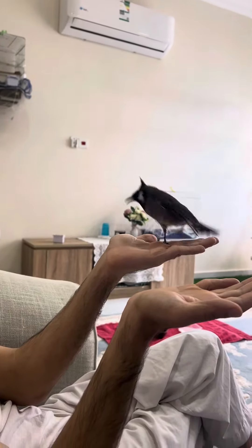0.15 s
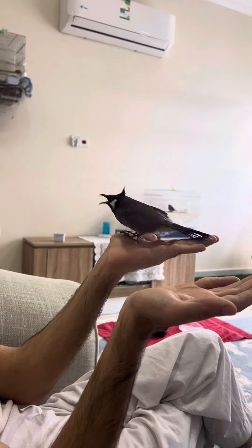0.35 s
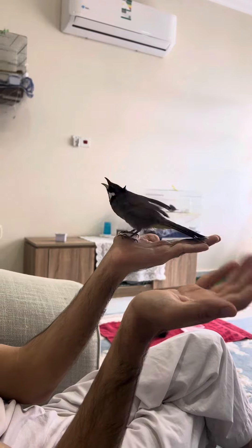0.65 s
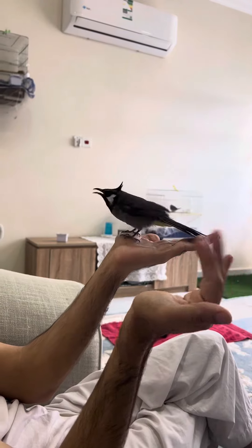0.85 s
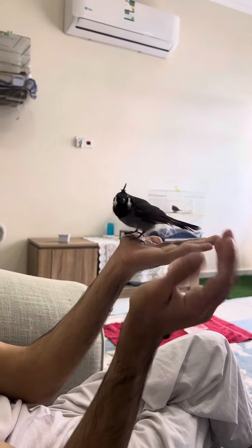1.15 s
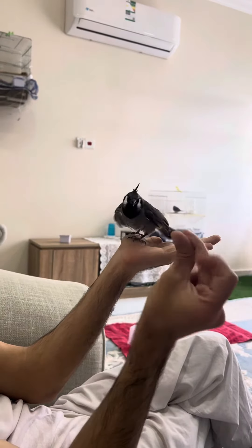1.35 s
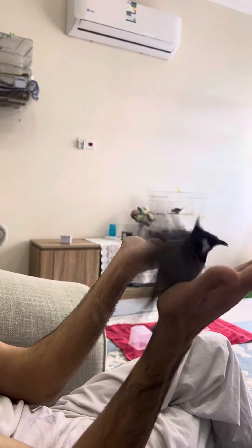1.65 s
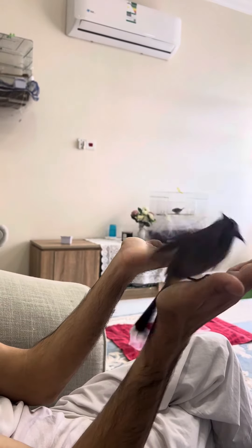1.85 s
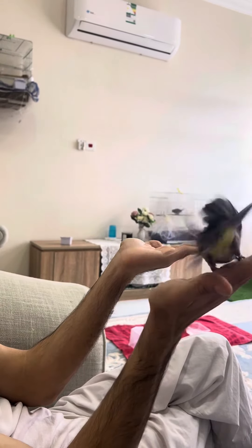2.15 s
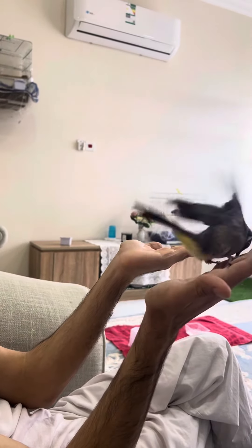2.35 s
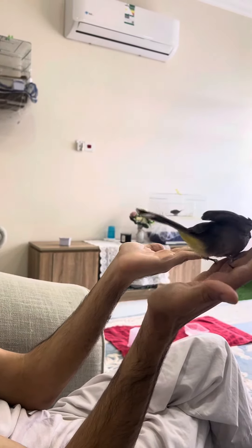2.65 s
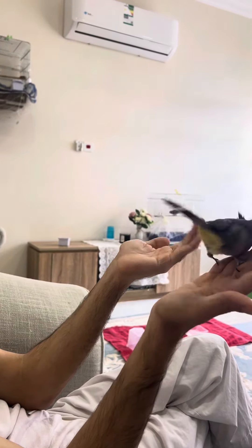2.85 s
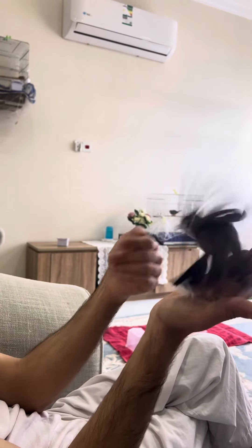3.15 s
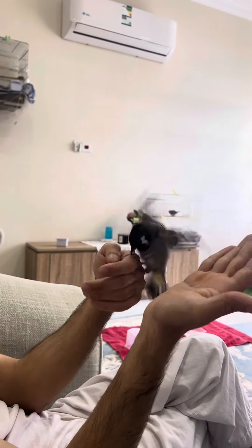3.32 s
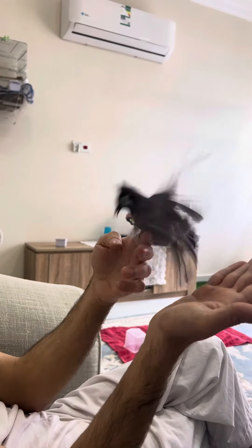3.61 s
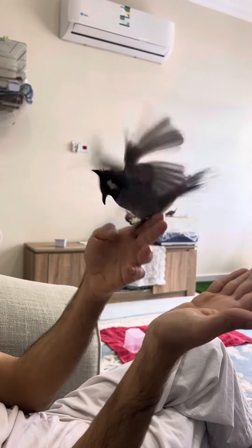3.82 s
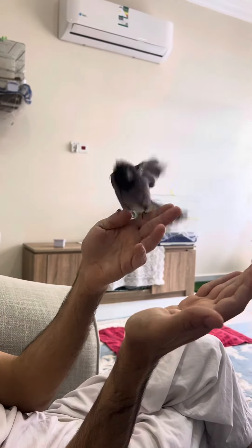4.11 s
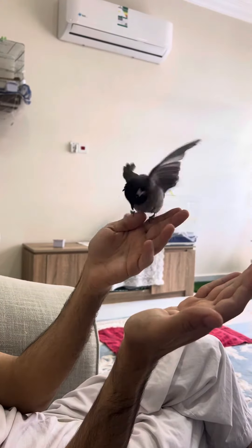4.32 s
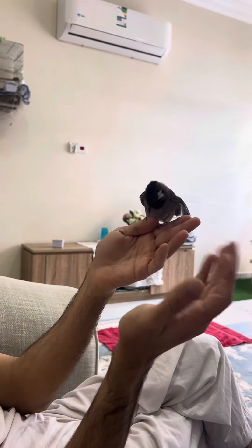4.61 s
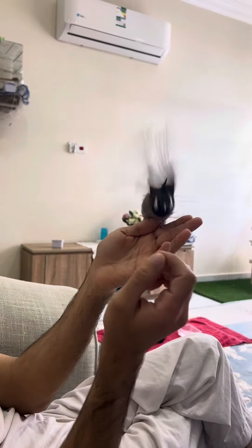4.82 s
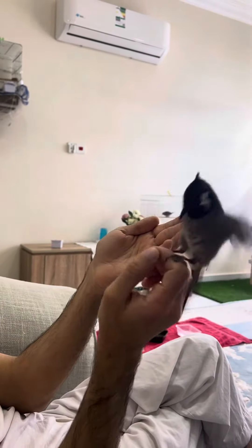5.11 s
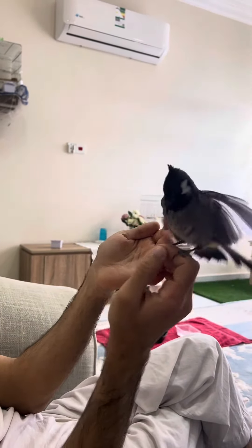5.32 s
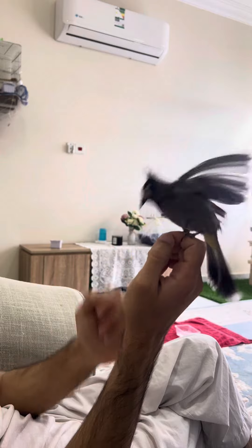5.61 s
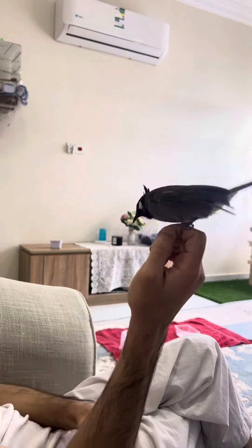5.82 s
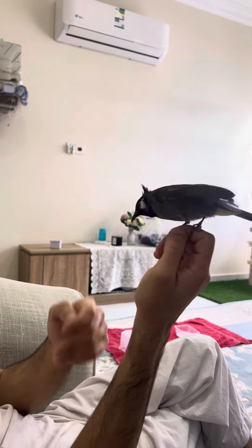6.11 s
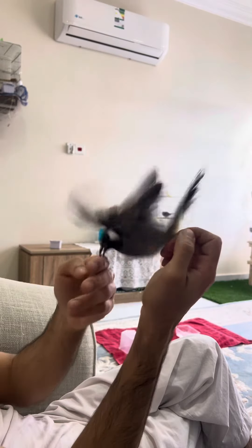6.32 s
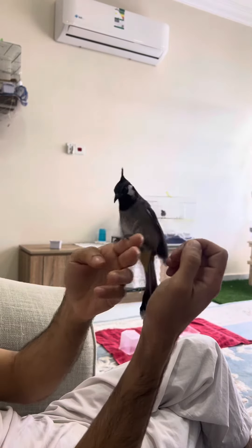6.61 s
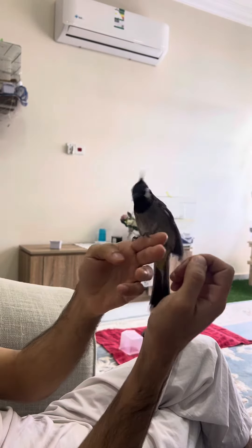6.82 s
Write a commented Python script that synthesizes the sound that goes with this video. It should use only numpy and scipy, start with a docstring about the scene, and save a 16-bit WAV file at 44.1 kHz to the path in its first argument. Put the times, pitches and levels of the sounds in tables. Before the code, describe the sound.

A small, hard-walled living room with faint steady hush. At the start a far bird's whistle glides upward through the room echo over low rumble and rustle from a nearby bird's wings. Bubbly far whistles rise and fall until about 0.85 s, with mellow near chirps around 0.5 and 1.15-1.4, and thin high peeps at 0.2 and 0.9. A crisp finger snap cracks at 1.37. From 1.5 to 1.9 wings flutter in fast soft puffs and thumps; short far chirrups follow until 2.6, then a quiet near chirp at 2.7. Far warbling returns from 3.0 to 4.0, with wing beats and dry claw ticks. It calms; low coos at 4.6-4.85 meet two firm flaps at 4.8-4.9 and another at 5.07. A short far warble comes at 5.45-5.65, a hoarse near chirp at 6.1, ticks and a light flap around 6.3, and a soft coo at 6.87.

```python
"""A whistle glides upward over low rumble and rustle: a far bird, smeared by the walls of a bare living room.
Close by, a small bird chirps and coos softly as bent notes of a few partials; its wing beats puff and thump as
shaped noise, claws and quills tick as filtered bursts, and one finger snap rings a bank of resonances. Decaying
noise serves as the room's echo, a steady hush lies beneath, and a noise suppressor, two ports that disagree in
phase and a steep low-pass shape the whole."""
import sys
import numpy as np
from scipy import signal
from scipy.fft import rfft, irfft
from scipy.io import wavfile
from scipy.ndimage import uniform_filter1d

SR = 44100
rng = np.random.default_rng(int(sys.argv[2]) if len(sys.argv) > 2 else 0)


def generate_wav(signal):
    """Clip the signal to [-1, 1] and save it as 16-bit WAV at the path in sys.argv[1]."""
    frames = np.transpose(np.atleast_2d(signal))
    scaled = np.clip(frames, -1, 1) * 32767
    pcm = np.round(scaled).astype(np.int16)
    wavfile.write(sys.argv[1], SR, pcm)


N = 306936
T = np.arange(N) / SR

# Wing beats. Each row: start in seconds, strength in dB before the offset of each sound it makes.
WING_BEATS = [(0.05, -47), (1.496, -43.5), (1.591, -47), (1.612, -49), (1.671, -51), (1.726, -53.5),
              (1.785, -50), (1.84, -55), (3.11, -48.5), (3.374, -56.5), (3.435, -49), (3.573, -51),
              (4.825, -44.5), (4.904, -44.5), (5.065, -48), (6.377, -51.5)]


def from_db(db):
    """Amplitude ratio: 20 decibels are a factor of ten."""
    return 10 ** (np.asarray(db) / 20)


def rms_one(x):
    """Normalisation to unit mean power."""
    return x / np.sqrt(np.mean(x ** 2) + 1e-20)


def at_hz(points, hz):
    """Linear interpolation on a logarithmic frequency axis."""
    p = np.array(points)
    return np.interp(np.log(np.maximum(hz, 1)), np.log(p[:, 0]), p[:, 1])


def drift(rate_hz):
    """Low-passed noise as a random fluctuation of unit rms, up to about the given rate."""
    lowpass = signal.butter(2, rate_hz, fs=SR, output="sos")
    white = rng.standard_normal(N + SR)
    return rms_one(signal.sosfilt(lowpass, white)[SR:])   # the filter settles in the first second


def pair(x):
    """Partial coherence: a shared and an opposed signal set how alike left and right are at each frequency."""
    # Each row: frequency in Hz, left-right likeness (1 = identical).
    likeness = [(105, 1), (300, .75), (1000, .97), (2300, .55), (8000, .93), (12000, .98)]
    shared, opposed = rfft(x)
    hz = np.arange(len(shared)) * SR / x.shape[1]
    alike = np.clip(at_hz(likeness, hz), 0, 1)
    mid = np.sqrt((1 + alike) / 2) * shared
    side = np.sqrt((1 - alike) / 2) * opposed
    return irfft([mid + side, mid - side], x.shape[1])


def coloured(spectrum):
    """Spectral shaping: white noise weighted at each frequency, in stereo, rms 1."""
    white = rfft(rng.standard_normal((2, N)))
    hz = np.arange(white.shape[1]) * SR / N
    return rms_one(pair(irfft(white * from_db(at_hz(spectrum, hz)), N)))


def near_bird():
    """A syrinx excites harmonic partials whose balance gives each kind of call its timbre."""
    # Notes. Each row: start in seconds, length in seconds, first, turning and last pitch in Hz,
    # turn as a share of the length, top level in dB before the levels of the partials.
    chirp_notes = [(.475, 0.073, 1640, 1617, 1620, 0.15, -36), (.53, 0.13, 1623, 1642, 1556, 0.41, -35.5),
                   (1.142, 0.094, 1463, 1590, 1572, 0.28, -31),
                   (1.222, 0.18, 1590, 1538, 1242, 0.22, -33.5),
                   (2.698, 0.041, 1290, 1342, 1453, 0.38, -37.5),
                   (2.745, 0.16, 1443, 1442, 1400, 0.75, -40)]
    hoarse_notes = [(6.056, 0.06, 1378, 1277, 1470, 0.63, -48.5),
                    (6.11, 0.092, 1368, 1347, 1277, 0.2, -39.5),
                    (6.188, 0.12, 1310, 1228, 1235, 0.34, -47.5)]
    low_coo_notes = [(4.606, 0.15, 777, 843.6, 848, 0.61, -50), (4.775, 0.03, 957, 891, 760, 0.31, -46),
                     (4.822, 0.0321, 868, 948, 740, 0.5, -46)]
    high_coo_notes = [(6.778, 0.045, 1100, 1047, 993, .3, -61.5), (6.78, 0.029, 890, 800, 770, .7, -58),
                      (6.815, 0.045, 1010, 1005, 990, 0.65, -47),
                      (6.866, 0.048, 922, 956, 919, 0.39, -36.5), (6.918, 0.03, 965, 960, 940, 0.32, -58)]
    peep_notes = [(.21, .11, 5120, 5020, 4530, .7, -59.5), (.93, 0.085, 4930, 4580, 4135, .65, -55.5)]
    # Levels of partials 1, 2, 3 .. in dB against the level of the note.
    chirp_db = [-28.5, -4.5, -28.5, -24.5, -35.5, -27, -32.5, -33]
    hoarse_db = [-20.5, -2.5, -22.5, -37, -31, -28]
    low_coo_db = [6, 2.5, -0.5, -12, -21]
    high_coo_db = [-30.5, -0.5, -31, -22.5]
    peep_db = [5, 0]

    clear = voice(arcs(chirp_notes, swell_db=12.0, fade_db=7.9), stack(chirp_db),
                  edge_s=0.0053, waver=0.0079, shimmer_db=1.0)
    peeps = voice(arcs(peep_notes, swell_db=8.6, fade_db=1.59), stack(peep_db),
                  edge_s=0.0084, waver=0.0017, shimmer_db=1.5)
    hoarse = voice(arcs(hoarse_notes, swell_db=8.0, fade_db=18.4), stack(hoarse_db),
                   edge_s=0.0023, waver=0.007, shimmer_db=2.5)
    low_coos = voice(arcs(low_coo_notes, swell_db=9.7, fade_db=7.23), stack(low_coo_db) + halves(-12.5),
                     edge_s=0.0019, waver=0.013, shimmer_db=1.0)
    high_coos = voice(arcs(high_coo_notes, swell_db=10.0, fade_db=7.2), stack(high_coo_db),
                      edge_s=0.007, waver=0.0093, shimmer_db=2.1)
    return clear + peeps + hoarse + low_coos + high_coos


def arcs(rows, swell_db, fade_db):
    """Pitch and level share one effort: pitch bends where the level tops out."""
    pitch_roundness, level_roundness = 1.3, 1.43   # exponents of the curves about the turn
    notes, away = [], np.linspace(-1, 1, num=11)   # -1 start, 0 turn, 1 end
    before = away < 0
    for start, length, first, turning, last, turn, db in rows:
        turn = np.clip(turn, .05, .95)
        s = start + length * (turn + away * np.where(before, turn, 1 - turn))
        hz = turning + np.abs(away) ** pitch_roundness * (np.where(before, first, last) - turning)
        under_top_db = np.abs(away) ** level_roundness * np.where(before, swell_db, fade_db)
        notes.append(np.transpose([s, hz, db - under_top_db]))
    return notes


def stack(levels_db):
    """Harmonic series: partials numbered from one."""
    return list(enumerate(levels_db, 1))


def halves(db):
    """Period doubling: alternately strong and weak closings add lines between the partials."""
    return [(k + .5, db) for k in range(1, 4)]


def voice(notes, partials, edge_s, waver, shimmer_db):
    """Additive synthesis: partials follow one slightly unsteady pitch, each flickering on its own."""
    dulling_db = 0.8   # extra loss per partial above the second for one dB under the note's top level
    out = np.zeros(N)
    unsteady = 1 + waver * drift(320.0)
    shimmer = shimmer_db * drift(100.0)
    for note in notes:
        s, hz, db = np.transpose(note)
        span = slice(max(int(s[0] * SR), 0), int(s[-1] * SR))
        t = T[span]
        pitch = uniform_filter1d(np.interp(t, s, hz), size=140) * unsteady[span]
        phase = 2 * np.pi * np.cumsum(pitch) / SR
        since_start = t - s[0] + (s[0] <= 0)   # a note already sounding at time 0 has no fade-in
        fade = np.clip(np.minimum(since_start, s[-1] - t) / edge_s, 0, 1)
        level_db = np.interp(t, s, db)
        under_db = level_db - db.max()
        tone = 0
        for k, partial_db in partials:
            flicker_db = np.roll(shimmer, int(k * SR / 10))[span]   # its own stretch of the drift
            dulled_db = dulling_db * max(k - 2, 0) * under_db
            audible = k * pitch < SR / 2
            tone = tone + from_db(partial_db + dulled_db + flicker_db) * np.sin(k * phase) * audible
        out[span] += np.sqrt(2) * from_db(level_db) * fade * tone
    return out


def far_bird():
    """Near-sinusoidal whistles, their octave where the beak favours it, and breath turbulence that follows them."""
    octave_db, breath_db = -23.5, -26.5   # gains ahead of the mix
    tone = voice(whistles(), stack([0]), edge_s=.006, waver=.002, shimmer_db=1.5)
    loud = uniform_filter1d(np.abs(tone), size=200)
    beak = signal.butter(2, [4600, 9800], "band", fs=SR, output="sos")
    octave = signal.sosfilt(beak, tone ** 2 / (loud + 1e-9))   # squaring a sine doubles its frequency
    breath_band = signal.butter(4, [7800, 12500], "band", fs=SR, output="sos")
    hiss = signal.sosfilt(breath_band, rng.standard_normal(N))
    return tone + from_db(octave_db) * octave + from_db(breath_db) * loud * hiss


def whistles():
    """Frequency modulation: every far note is a line of (seconds, Hz, dB) points."""
    # Each row: start in seconds, length in seconds, first pitch in Hz, goal pitch in Hz,
    # easing time in seconds, top level in dB within the far bird's song.
    slide_rows = [(-.05, 0.26, 2217, 3361, 0.037, -35), (0.393, 0.048, 3660, 4350, 0.0066, -42.5),
                  (1.723, 0.016, 2300, 2850, 0.0067, -37.5), (1.884, .022, 4910, 3180, .0045, -40.5),
                  (2.192, 0.1, 2910, 4469, .0068, -34.5), (2.259, 0.021, 2190, 2864, 0.0066, -40.5),
                  (2.958, 0.031, 2110, 2710, 0.0064, -44.5), (2.977, 0.021, 1580, 2010, 0.0055, -52),
                  (2.986, 0.016, 11700, 8580, 0.0015, -36.5), (3.048, 0.27, 2158, 3345, .038, -36.5),
                  (5.443, 0.022, 2140, 2827, 0.0066, -41), (5.472, 0.018, 12300, 8500, 0.0032, -37.5)]
    # Each row: start in seconds, first, top and last pitch in Hz, level at the low point in dB within the song.
    dip_rows = [(1.845, 3710, 4850, 4910, -39), (2.398, 3400, 4400, 5100, -41.5),
                (2.542, 3147, 3900, 4265, -36), (5.558, 3965, 3680, 3980, -48)]
    # Figures by name. Each row: seconds after the start at pace 1, pitch in Hz at pitch 1,
    # level in dB against the figure's level.
    figure_shapes = { "hook": [(0, 3550, -13), (.017, 3700, -10), (.024, 5260, -18.5), (.038, 5300, -8),
                     (.052, 3700, -3), (.067, 2950, -4.5)], "rise": [(0, 3127, -14), (.06, 4127, -6.5),
                     (.115, 4680, 2.5), (.165, 4930, 2), (.21, 4915, -10)], "high fall": [(0, 8130, -4),
                     (.02, 7860, -2.5), (.044, 6300, -9.5)], "closing fall": [(0, 5520, -2.5),
                     (.017, 8244, -14.5), (.05, 6855, -12), (.104, 6990, -5), (.118, 7030, 1),
                     (.159, 4750, 0.9), (.185, 3534, -7.5), (.212, 2836, -16)], "warble": [(0, 7150, -27.5),
                     (.013, 4236, -14), (.025, 6200, -9.5), (.033, 6787, -6.5), (.05, 5440, -3.5),
                     (.056, 6580, -7), (.074, 5150, 0.5), (.09, 5730, -6), (.123, 5870, -1.5),
                     (.136, 5100, -1), (.148, 4190, -1.5), (.164, 3464, -21)], }
    # Each row: figure name, start in seconds, time stretch (1 = as written), pitch factor (1 = as written),
    # level in dB within the song.
    figures_sung = [("hook", .278, .76, 0.97, -24), ("rise", .43, 1.01, 1.003, -29),
                    ("closing fall", 0.619, 0.98, 0.98, -30), ("warble", 2.982, 0.98, 1.008, -24),
                    ("hook", 3.405, 1.06, 1.005, -27), ("high fall", 3.438, 0.97, 0.96, -38),
                    ("rise", 3.535, 1.01, 1.003, -28.5), ("closing fall", 3.748, 1.005, 1.005, -32),
                    ("warble", 5.472, 1.005, 0.98, -26.5)]
    figures = []
    for name, start, pace, pitch, db in figures_sung:
        figures.append(np.array(figure_shapes[name]) * [pace, pitch, 1] + [start, 0, db])
    return [slide(*row) for row in slide_rows] + [dip(*row) for row in dip_rows] + figures


def slide(start, length, first, goal, ease_s, db):
    """Critically damped glide: pitch leaves gently and closes in on its goal; the level swells, then sags."""
    swell_db, sag_db_per_s = 17.5, 25
    age = length * np.linspace(0, 1, num=16) ** 1.5
    top_s = 1.3 * ease_s + 0.28 * length   # when the swell tops out
    swell = -swell_db * np.clip(1 - age / top_s, 0, 1)
    sag = -sag_db_per_s * np.clip(age - top_s, 0, None)
    hz = goal + (first - goal) * (1 + age / ease_s) * np.exp(-age / ease_s)
    return np.transpose([start + age, hz, db + swell + sag])


def dip(start, first, top, last, db):
    """Piecewise-linear glide: down to one low pitch, a short hold, up and a fading tail."""
    low_hz, fall_s, hold_s, rise_s, tail_s = 2635, 0.009, 0.009, 0.011, 0.021
    s = start + np.cumsum([0, fall_s, hold_s, rise_s, tail_s])
    level_db = db + np.array([-13, 0, 0, -5.5, -13.5])
    return np.transpose([s, [first, low_hz, low_hz, top, last], level_db])


def snap():
    """Impulse excitation: the finger's slip and its landing both ring a bank of resonances."""
    # The slip, then the landing. Each row: time in seconds, impulse strength in dB.
    contacts = [(1.3666, -27), (1.3671, -15)]
    # Each row: resonance in Hz, level in dB against the impulse, time to fall by 60 dB in seconds.
    snap_modes = [(1850, 2.5, .011), (1350, -3, .006), (900, -13, .008), (5600, -1, .002),
                  (7600, 2.5, .0018), (11000, -6, .0012)]
    clicks = np.zeros(N)
    for s, db in contacts:
        clicks[int(s * SR)] = from_db(db)
    rung = sum(from_db(db) * ring(clicks, hz, t60) for hz, db, t60 in snap_modes)
    # the ring carries no bass below about 500 Hz
    return signal.sosfilt(signal.butter(2, 500, "high", fs=SR, output="sos"), rung)


def ring(clicks, hz, t60):
    """Damped resonance: a unit click starts a decaying sine of initial height 1."""
    r, w = from_db(-60 / (t60 * SR)), 2 * np.pi * hz / SR
    return signal.lfilter([0, np.sin(w)], [1, -2 * r * np.cos(w), r * r], clicks + 1e-18)


def ticks():
    """Brief contact has a broad spectrum: claws and quills click as band-passed, fast-decaying noise."""
    # Each row: start in seconds, direct-sound peak in dB, nominal centre of the band in Hz.
    tick_rows = [(3.3004, -25, 7420), (3.546, -30.5, 1220), (3.7248, -29.5, 1402), (4.2239, -29, 3656),
                 (4.912, -38, 8000), (5.0099, -33, 2480), (6.272, -34, 6400), (6.3451, -22.5, 3920),
                 (6.4283, -40.5, 2000)]
    decay_s, length = 0.00086, 400   # length in samples
    out, noise = np.zeros(N), rng.standard_normal((len(tick_rows), length))
    for (s, db, hz), burst in zip(tick_rows, noise):
        edges = [hz / 3.14, min(hz * 4.0, SR / 2.2)]
        band = signal.butter(2, edges, "band", fs=SR, output="sos")
        crack = signal.sosfilt(band, burst * np.exp(-np.arange(length) / SR / decay_s))
        out[int(s * SR):][:length] += from_db(db) * crack / np.abs(crack).max()
    return out


def air():
    """Turbulent flow: rumble and rustle swell with movement, and each wing beat adds a puff to both."""
    # Each row: time in seconds, rumble level in dB, rustle level in dB, both before drift and the rustle's lift.
    movement = [(0.0, -101, -58), (.17, -48, -56), (.54, -74.5, -67), (1.1, -77, -77.5), (1.45, -61, -82),
                (1.65, -64.5, -79.5), (2.0, -61.5, -72.5), (2.6, -62.5, -76.5), (2.8, -67.5, -80),
                (3.43, -53.5, -66), (3.9, -53.5, -67.5), (4.25, -66, -72.5), (4.7, -60, -74.5),
                (5.1, -54, -82.5), (5.4, -65, -78), (6.1, -75.5, -75.5), (6.4, -59, -67.5),
                (6.96, -74.5, -89.5)]
    # Spectra. Each row: frequency in Hz, relative density in dB per Hz.
    rumble_spectrum = [(22, -20.5), (38, 2), (54, 6.5), (110, -6), (200, -11), (400, -38.5)]
    rustle_spectrum = [(150, -7), (400, -6), (900, -8), (2000, -12.5), (5000, -20), (9000, -18),
                       (11500, -17), (14000, -35.5)]
    s, rumble_db, rustle_db = np.transpose(movement)
    rumble = from_db(np.interp(T, s, rumble_db) + 3.7 * drift(22.0))
    rustle = from_db(np.interp(T, s, rustle_db) + 5.5)
    for start, db in WING_BEATS:
        age = np.clip(T - start, 0, None) / 0.056   # in units of 56 ms
        attack = np.minimum(age * 25, 1)
        decay = 1.3 * np.exp(-age * 7.0) + .22 * np.exp(-age)
        rustle = rustle + from_db(db - 4.0) * attack * decay
        rumble = rumble + from_db(db - 2.0) * age * np.exp(-age / 0.8)   # the push of air swells later
    rumbling = rumble * coloured(rumble_spectrum)
    return rumbling + rustle * from_db(1.9 * drift(30.0)) * coloured(rustle_spectrum)


def thumps():
    """Low-frequency pressure pulse: each wing beat carries a short dull flap of noise."""
    # Each row: frequency in Hz, relative density in dB per Hz.
    thump_spectrum = [(50, -13), (110, -0.6), (250, -9.5), (450, -11), (900, -41.5)]
    thump_db, top_s = -6.5, 0.019   # level against the beat, time to its top
    start, beat_db = np.array(WING_BEATS).T
    age = np.clip(T - start[:, None], 0, None) / top_s
    pulses = from_db(beat_db) @ (age * np.exp(1 - age))
    return from_db(thump_db) * pulses * coloured(thump_spectrum)


def room(far, near):
    """Diffuse reverberation: dense echoes that die faster in the treble, with an onset for each distance."""
    # Each row: frequency in Hz, time to fall by 60 dB in seconds.
    decay_times = [(300, 0.67), (3000, 0.58), (7000, 0.52)]
    early_db, early_s = 8, .012   # nearest surfaces around the far bird: boost over the tail, decay time
    back_wall_db, back_wall_s = 5, .045   # a late slap from the end wall
    age, edges = np.arange(SR) / SR, np.geomspace(100, 18000, num=9)
    echo, white = 0, rng.standard_normal((2, SR))
    for low, high in zip(edges, edges[1:]):
        band = signal.sosfilt(signal.butter(2, [low, high], "band", fs=SR, output="sos"), white)
        echo = echo + band * from_db(-60 * age / at_hz(decay_times, np.sqrt(low * high)))
    echo = rms_one(pair(echo)) / np.sqrt(SR)
    early = from_db(early_db) * np.exp(-age / early_s)
    slap = from_db(back_wall_db) * np.exp(-((age - back_wall_s) / .003) ** 2)
    late = 1 - np.exp(-age / .005)   # echoes of near sounds build up gradually
    far_echo = echo * (1 + early + slap) * np.sqrt(late)
    near_echo = echo * late
    far_wet = signal.fftconvolve(far[None], far_echo, axes=1)[:, :N]
    return far_wet + signal.fftconvolve(near[None], near_echo, axes=1)[:, :N]


def hush():
    """Stationary noise: a low steady background hum of air."""
    # Each row: frequency in Hz, relative density in dB per Hz.
    hush_spectrum = [(120, -5.5), (400, 2.5), (900, -21.5), (2300, -6.5), (4000, -30.5), (15500, -44)]
    return from_db(-75) * coloured(hush_spectrum)


def scene():
    """Superposition: the far bird mostly through the room, the rest close by."""
    direct_db = -11   # the far bird's straight path against its feed to the echoes
    far = from_db(-2.5) * far_bird()
    near = near_bird() + snap() + ticks()
    wet = room(far, from_db(-10.0) * near)
    return from_db(direct_db) * far + near + wet + air() + thumps() + hush()


def record(dry):
    """Level-dependent filtering dims quiet treble, the ports part in phase, and a low-pass cuts the top."""
    quiet_db, most_dimming_db = -60.5, 11   # treble falls dB for dB under the threshold, at most this far
    opposed_hz, bend = 13230, 2.08   # left trails right by nearly half a cycle from here up; growth exponent
    cutoff_hz = 16750
    spectrum, hz = rfft(dry), np.arange(N // 2 + 1) * SR / N
    heard = irfft(spectrum[0] * (hz > 600), N)   # the left side without bass steers the suppressor
    level_db = 10 * np.log10(uniform_filter1d(heard ** 2, size=3500) + 1e-12)
    treble = irfft(spectrum / (1 + (3500 / (hz + 1)) ** 4), N)
    treble_gain = from_db(np.clip(level_db - quiet_db, -most_dimming_db, 0))
    dimmed = dry + treble * (treble_gain - 1)
    turn = np.exp(-.46j * np.pi * np.minimum(hz / opposed_hz, 1) ** bend)
    ported = irfft(rfft(dimmed) * [turn, turn.conj()], N)
    return signal.sosfilt(signal.cheby2(12, 70, cutoff_hz, fs=SR, output="sos"), ported)


dry = scene()
out = record(dry)
generate_wav(out)
```